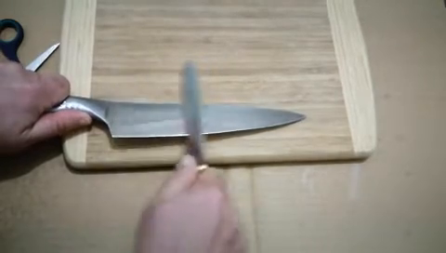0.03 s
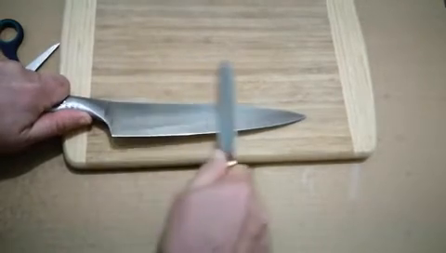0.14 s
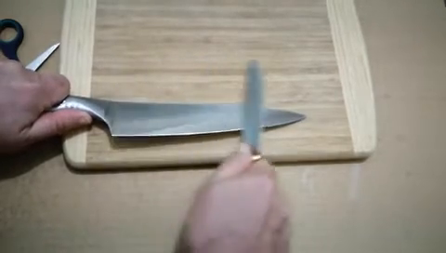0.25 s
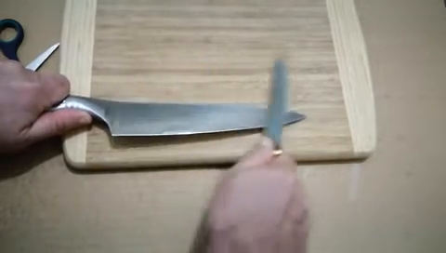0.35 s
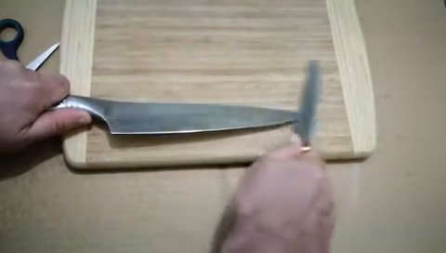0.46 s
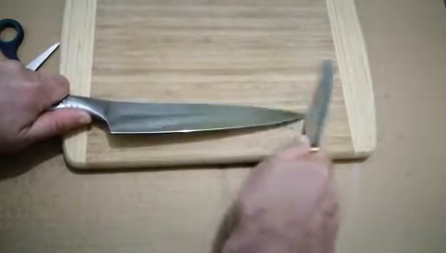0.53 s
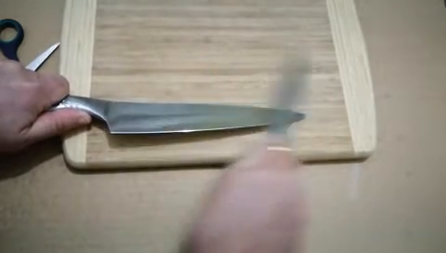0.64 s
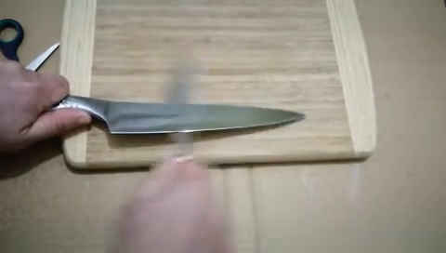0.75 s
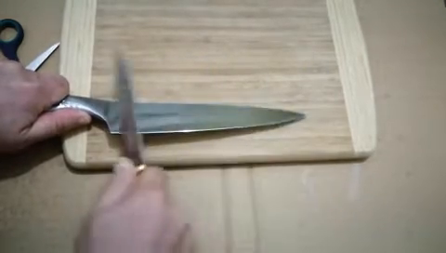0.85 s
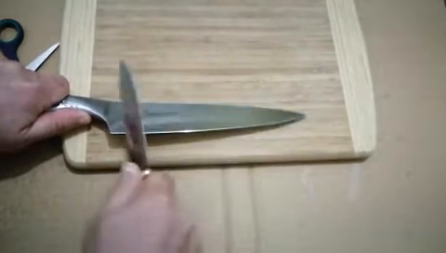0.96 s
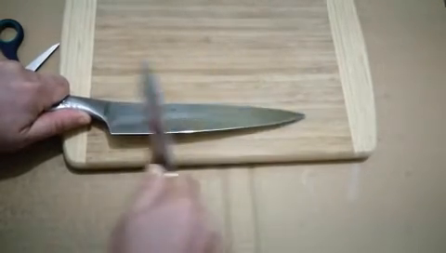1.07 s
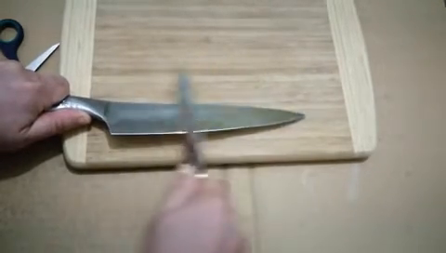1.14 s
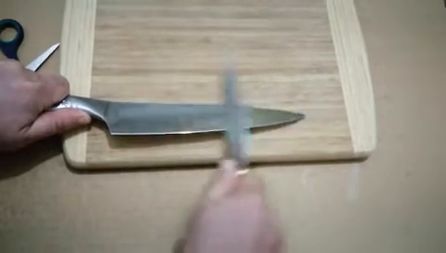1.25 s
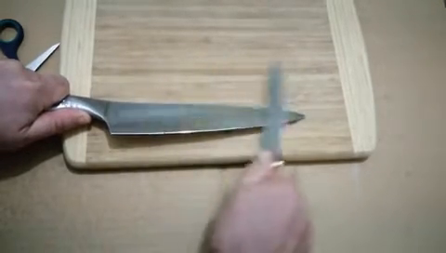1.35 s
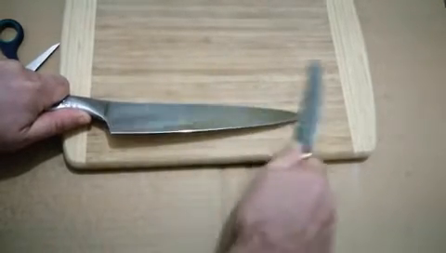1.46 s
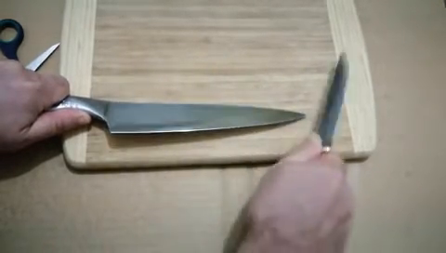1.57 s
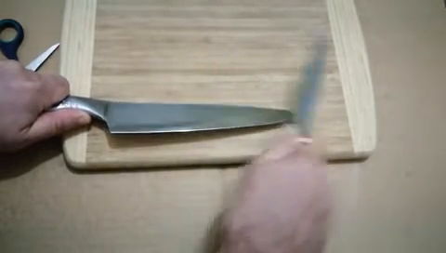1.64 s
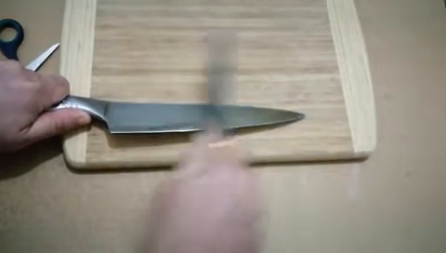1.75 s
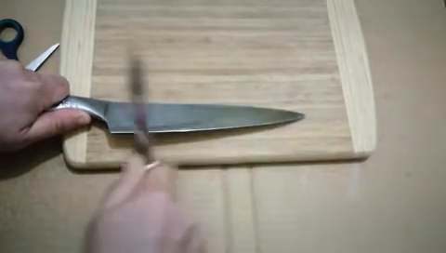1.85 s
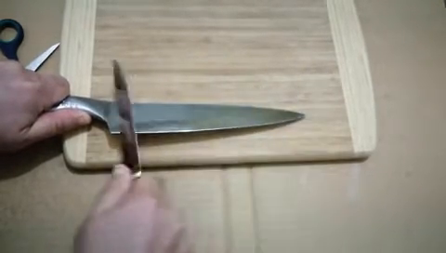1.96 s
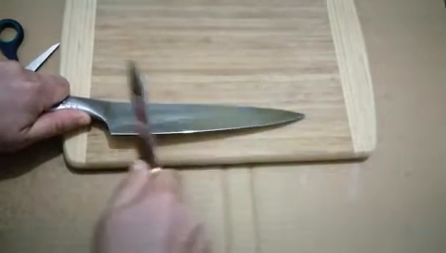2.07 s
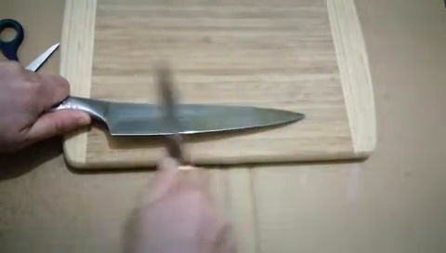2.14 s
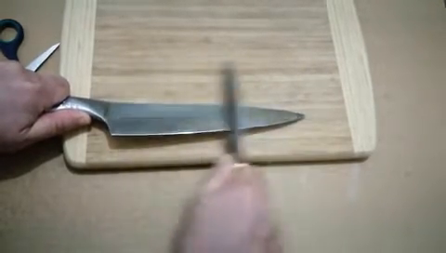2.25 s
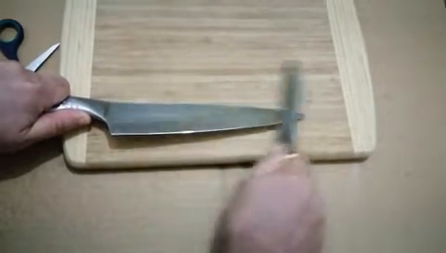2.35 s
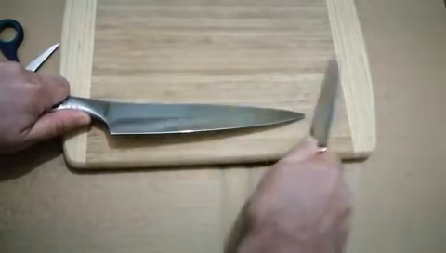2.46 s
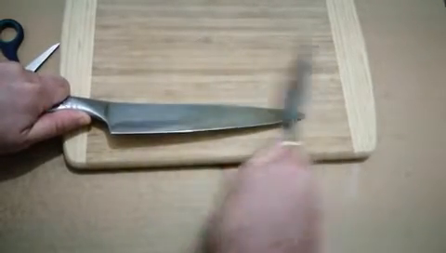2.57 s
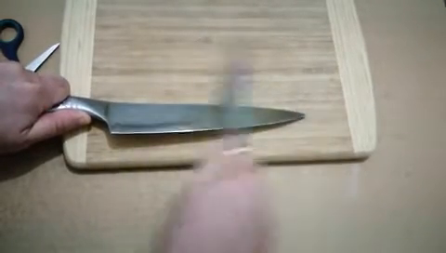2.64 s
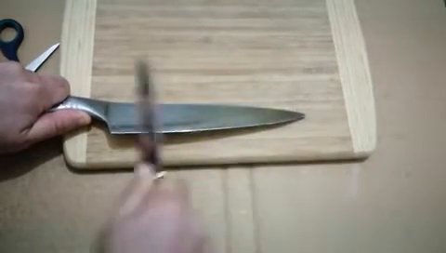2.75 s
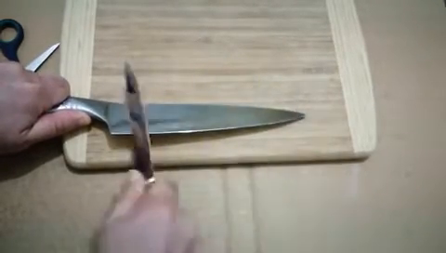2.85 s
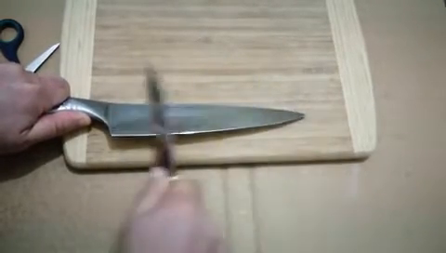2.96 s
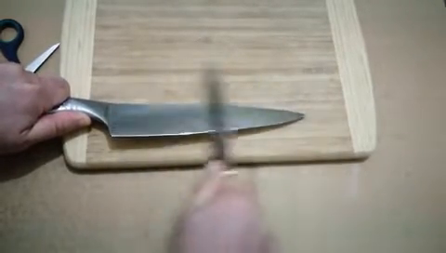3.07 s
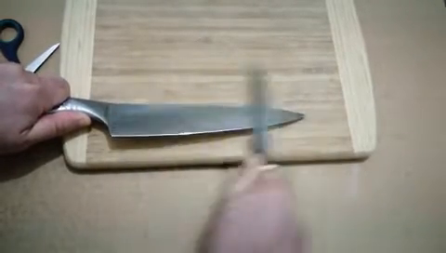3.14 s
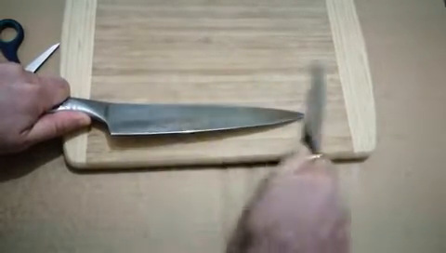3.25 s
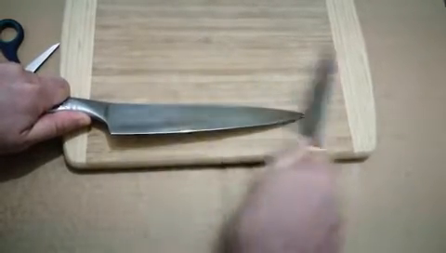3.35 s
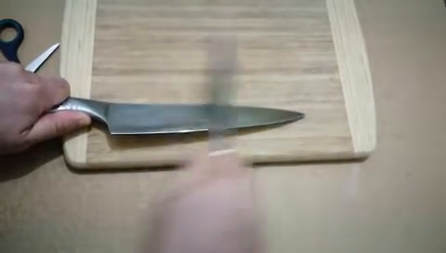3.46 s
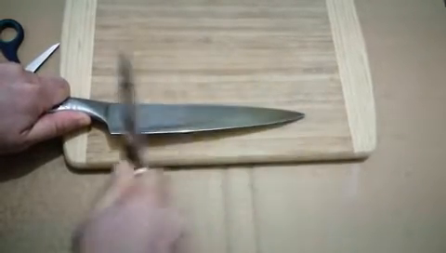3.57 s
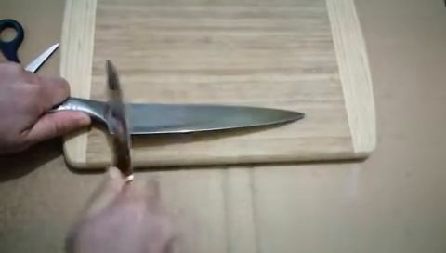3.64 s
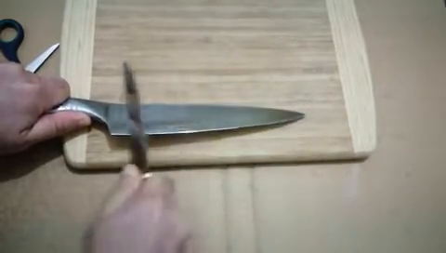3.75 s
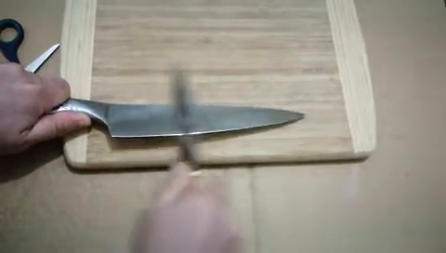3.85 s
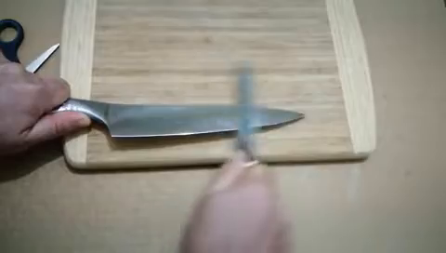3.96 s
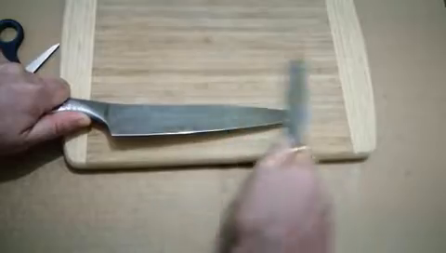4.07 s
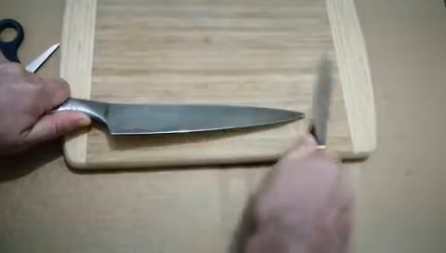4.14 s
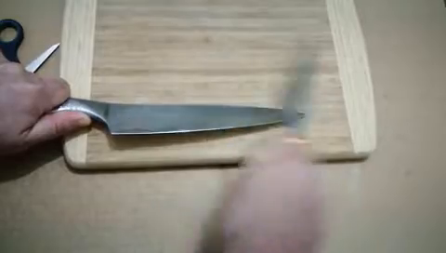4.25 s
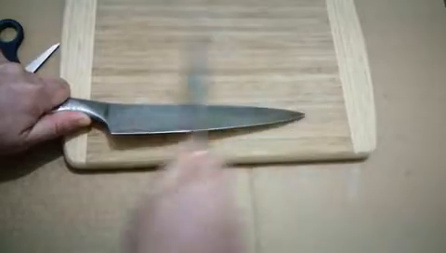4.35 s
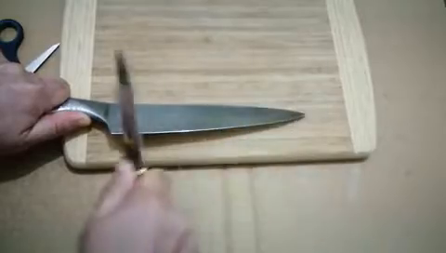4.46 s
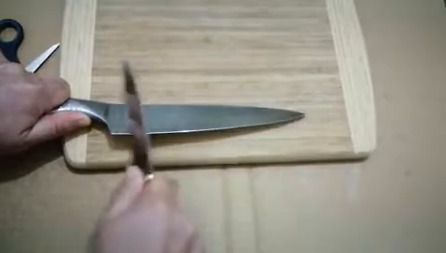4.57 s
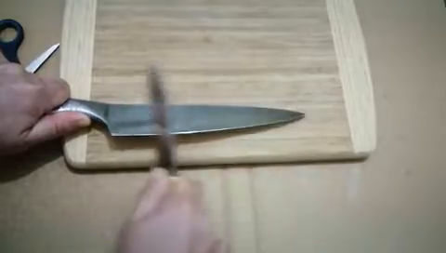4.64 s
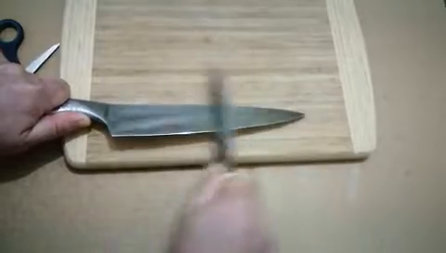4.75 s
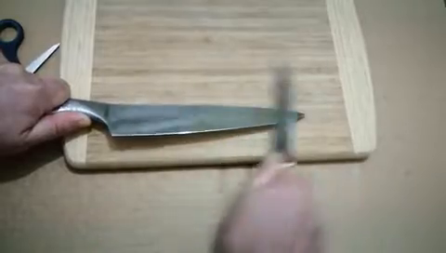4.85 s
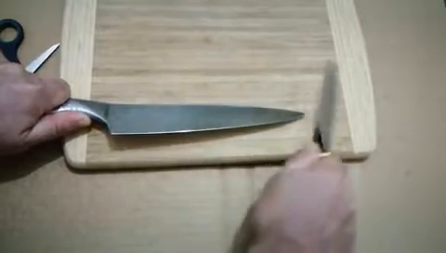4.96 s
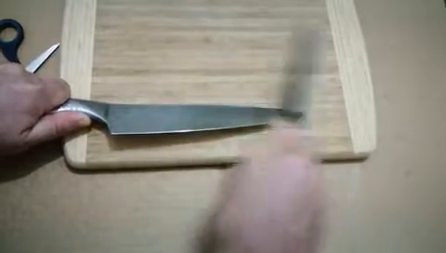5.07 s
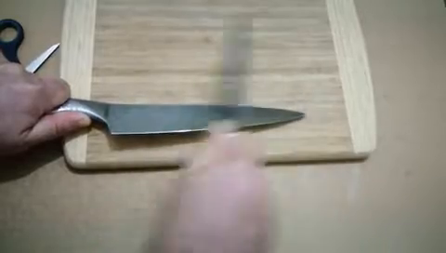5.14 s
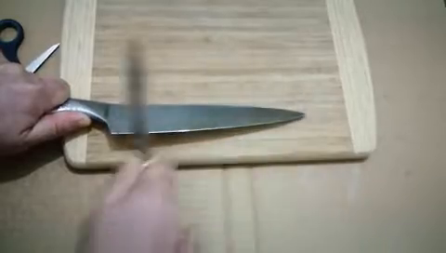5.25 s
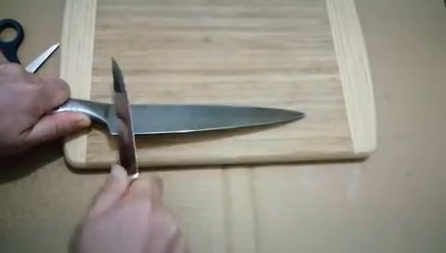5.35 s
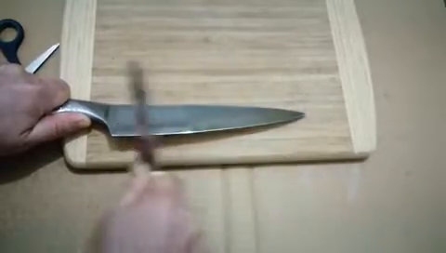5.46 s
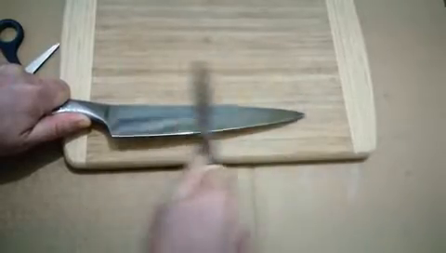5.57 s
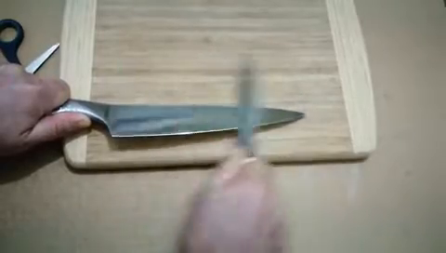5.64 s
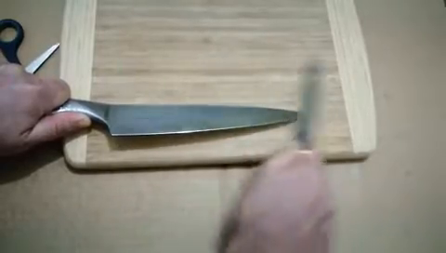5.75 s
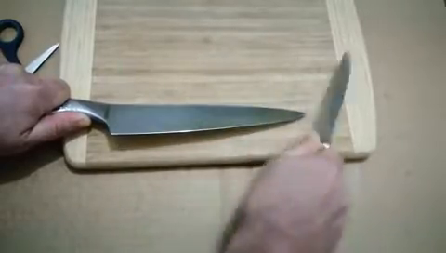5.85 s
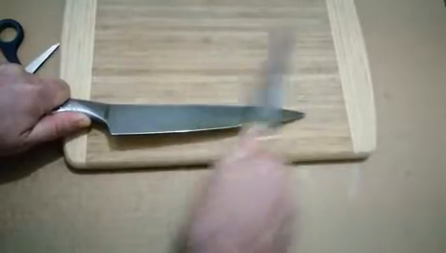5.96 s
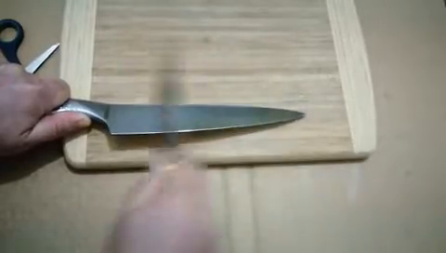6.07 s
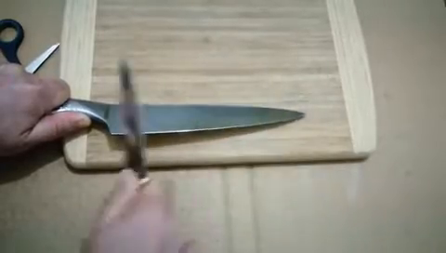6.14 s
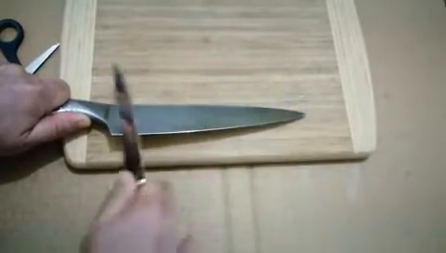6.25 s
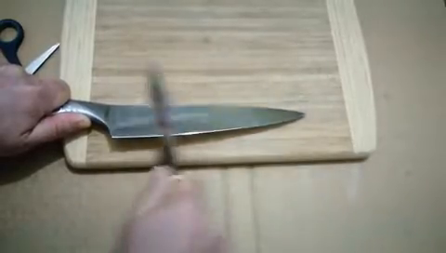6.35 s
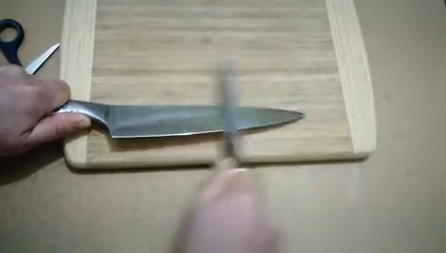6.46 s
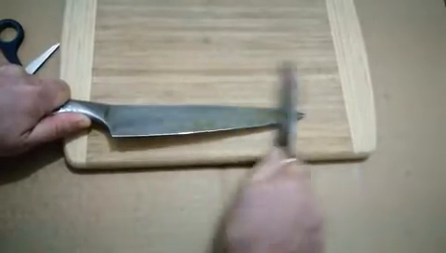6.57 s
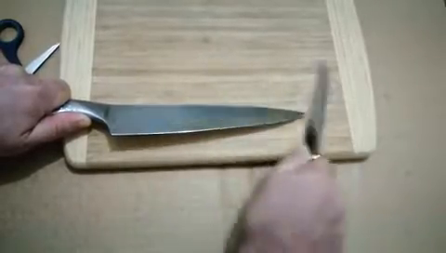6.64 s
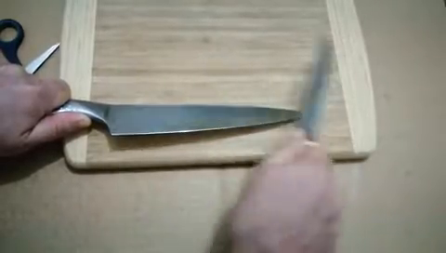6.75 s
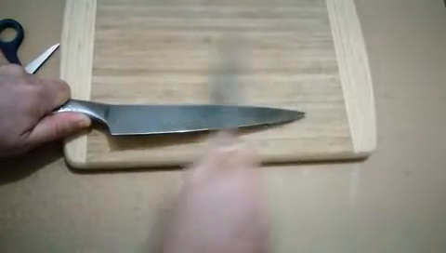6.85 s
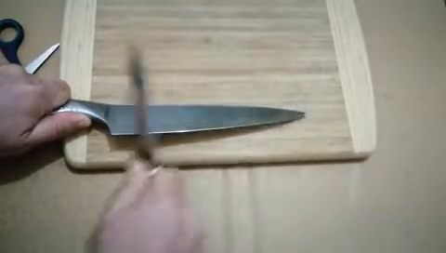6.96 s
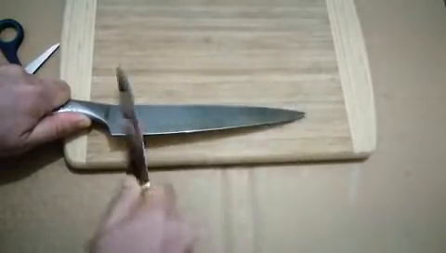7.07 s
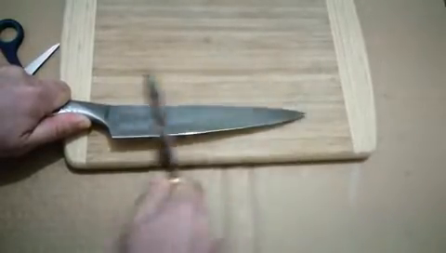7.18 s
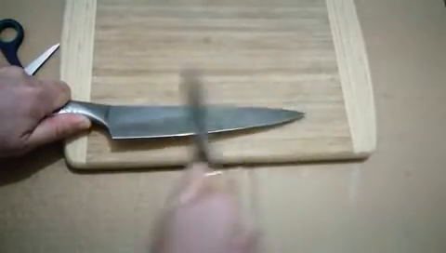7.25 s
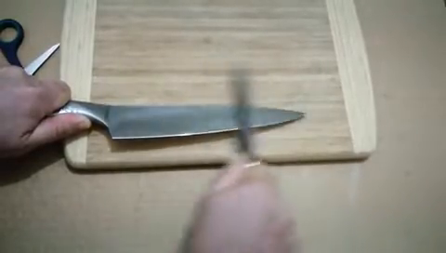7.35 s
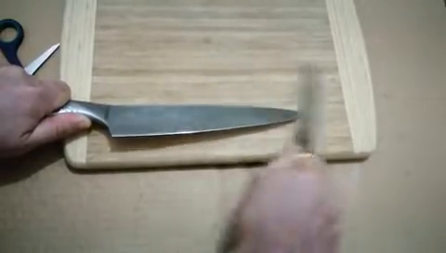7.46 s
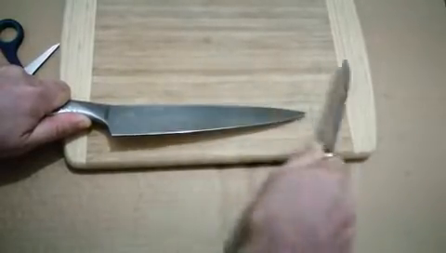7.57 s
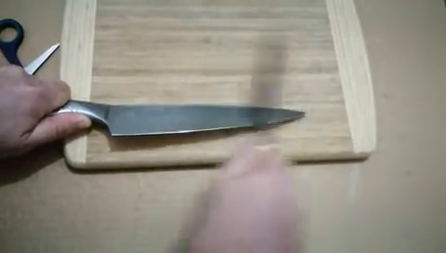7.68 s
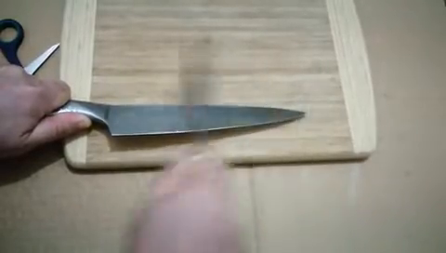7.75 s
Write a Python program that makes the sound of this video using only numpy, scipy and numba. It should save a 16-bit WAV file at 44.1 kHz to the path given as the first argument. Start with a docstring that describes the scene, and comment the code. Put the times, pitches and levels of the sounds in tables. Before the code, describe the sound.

Close microphones in a quiet room pick up one knife scraping along another in an even rhythm. The blade lands with a clack, grates along the steel with small ticks and a hoarse rasp, then slips off with a short, high ring. The wooden board underneath adds low, hollow knocks. There are nine strokes with brief gaps, some later ones ending more sharply, over faint rumble and hiss.

```python
"""Gritty scrapes, each ending in a bright ring: a small steel knife is drawn along a large one, stroke by
stroke. The large knife lies flat on a wooden board in a quiet room, and two close microphones listen.
The edge lands near the handle, grates along the blade and flicks off the tip, leaving the steel ringing.
Burrs (tiny rough bits of metal) catch as dense clicks, and these make the steel and the board vibrate."""
import sys
import numpy as np
from scipy import signal
from scipy.fft import rfft, irfft, next_fast_len
from scipy.io import wavfile
from scipy.ndimage import uniform_filter1d
from numba import njit

SR = 44100
rng = np.random.default_rng(int(sys.argv[2]) if len(sys.argv) > 2 else 0)


def digitize_waveform(pressure):
    """Quantize a signal to 16-bit integers and store it at the path in sys.argv[1].

    Rows of a 2-D input are taken as channels; values are limited to [-1, 1].
    """
    field = np.atleast_2d(pressure).T
    bounded = np.clip(field, -1, 1)
    quanta = np.round(bounded * 32767).astype(np.int16)
    wavfile.write(sys.argv[1], SR, quanta)


N = 344356
SIZE = next_fast_len(N + SR)
HZ = np.maximum(np.arange(SIZE // 2 + 1) * SR / SIZE, 1)   # the frequencies of a spectrum


def from_db(db):
    """Turn decibels into a gain."""
    return 10 ** (np.asarray(db) / 20)


def rms_one(x):
    """Scale a signal to an average power of 1."""
    return x / np.sqrt(np.mean(x ** 2) + 1e-20)


def at_hz(points, hz):
    """Read between the rows of a table, along a log-frequency axis."""
    hz_points, values = np.transpose(points)
    return np.interp(np.log(hz), np.log(np.maximum(hz_points, 1)), values)


def shaped(x, response):
    """Filter with one gain for each frequency in HZ."""
    return irfft(rfft(x, SIZE) * response, SIZE)[..., :N]


def band(x, low, high):
    """Keep what lies between two frequencies."""
    return signal.sosfilt(signal.butter(2, [low, high], "band", fs=SR, output="sos"), x)


def drift(rate_hz, count=1, spread_db=None):
    """Slow random wandering of about +-1, or a wandering gain if spread_db is given."""
    r = np.exp(-128 * np.pi * rate_hz / SR)
    noise = rng.standard_normal((count, N // 64 + 702))   # one value per 64 samples
    slow = signal.lfilter([1], [1, -2 * r, r * r], noise)[:, 700:]
    slow = slow / slow.std(axis=1, keepdims=True)
    slow = slow if spread_db is None else from_db(spread_db * slow)
    return np.repeat(slow, 64, axis=1)[:, :N]


def resonate(x, hz, t60):
    """One mode: a natural tone of an object. Its ring time t60 is how long it takes to fade by 60 dB."""
    r = from_db(-60 / (max(t60, .004) * SR))
    feedback = [1, -2 * r * np.cos(2 * np.pi * hz / SR), r * r]
    return signal.lfilter(np.array([1, 0, -1]) * (1 - r * r) / 2, feedback, x + 1e-18)


@njit
def glide(x, hz, width_hz):
    """A resonance whose pitch can move."""
    r = np.exp(-np.pi * width_hz / SR)
    y = np.zeros(len(x))
    for i in range(2, len(x)):
        drive = (1 - r * r) / 2 * (x[i] - x[i - 2])
        y[i] = drive + 2 * r * np.cos(2 * np.pi * hz[i] / SR) * y[i - 1] - r * r * y[i - 2]
    return y


# Tone of the background noise: f/Hz, relative level/dB
AIR_TONE = [(13, -49.5), (22, 0.5), (66, -6.5), (142, -9.5), (203, -5), (425, -13.5), (501, -15.5),
            (2260, -24), (2740, -24), (5740, -27.5), (15400, -35.5)]
# How alike its left and right sides are: f/Hz, likeness (1 same, -1 opposite)
AIR_LIKENESS = [(60, 0.35), (180, 0.71), (550, 0.94), (1650, -0.41), (4970, 0.032), (15000, 1)]
def air():
    """Quiet room rumble and microphone hiss."""
    mid, side = rng.standard_normal((2, N))
    alike = np.clip(at_hz(AIR_LIKENESS, HZ), -1, 1)
    colour = from_db(at_hz(AIR_TONE, HZ))
    mid = shaped(mid, colour * np.sqrt(1 + alike))
    side = shaped(side, colour * np.sqrt(1 - alike))
    return from_db(-64.5) * rms_one(mid + side * [[1], [-1]])


# What the walls send back: f/Hz, relative level/dB
WALLS = [(100, -12.5), (500, 6.5), (1300, -2), (2500, 6.5), (4200, 3), (6500, -4), (10000, -6.5),
         (15000, -14)]
# How long the room rings: f/Hz, ring time/s
ROOM_RING = [(100, 0.4), (700, 0.28), (5000, 0.3), (13000, 0.4)]
def room(x, gain_db=-7.5, alike_below_hz=600):
    """Echoes blur into a tail of fading noise, alike on both sides in the bass."""
    t, tail = np.arange(SR // 2) / SR, 0
    for low in 60 * 2. ** np.arange(8):
        hz = low * np.sqrt(2)
        mid, side = band(rng.standard_normal((2, len(t))), low, 2 * low)
        apart = np.sqrt(hz / (hz + alike_below_hz))
        tail = tail + (mid + apart * side * [[1], [-1]]) * from_db(-60 * t / at_hz(ROOM_RING, hz))
    tail = tail * (1 - np.exp(-(t / 0.001) ** 2))   # the first echoes take a moment
    tail = tail / np.sqrt(np.sum(tail ** 2) / 2)
    return shaped(x, rfft(tail, SIZE) * from_db(at_hz(WALLS, HZ) + gain_db))


def modes(table, knock, mid, tip, held, shimmer_db):
    """Modes ring freely at the tip; elsewhere the pressing edge cuts their ring time to the share held."""
    out = np.zeros((2, N))
    for k, (hz, t60, knock_db, mid_db, tip_db, pan_db) in enumerate(table):
        # the edge crosses each mode's still spots (nodes), and the blade tilts
        nodes, tilt = drift(8.9, count=2, spread_db=shimmer_db / 2)
        pressed = from_db(knock_db) * knock + from_db(mid_db) * nodes * nodes * mid
        ring = resonate(pressed, hz, t60 * held) + resonate(from_db(tip_db) * nodes * tip, hz, t60)
        side = (-1) ** k * from_db(pan_db / 2) * tilt
        out[0] += ring * side
        out[1] += ring / side
    return out


# Modes of the board: f/Hz, ring time/s, knock level/dB, mid-blade level/dB, tip level/dB, left-right/dB
BOARD_MODES = [(72.3, 0.2, 10.5, -6.5, -10, 1.5), (175.4, 0.14, 6.5, -0.5, -8, 1.5),
               (250.3, 0.14, 4.5, -1, -9, 5), (353, 0.039, 0, -5.5, 1, 8.5), (746, 0.028, -4, -5.5, -7, -3),
               (834, 0.053, 0.5, -5.5, 0, 6), (1283, 0.024, -13, -33.5, -12.5, 0.5)]
def board(landing, thud, mid, tip):
    """The wood under the large knife answers knocks and scraping with low, hollow tones."""
    knock = from_db(3.5) * band(landing, 464, 3000) + thud
    return from_db(18) * modes(BOARD_MODES, knock, mid, tip, held=0.86, shimmer_db=1.5)


# Tones of the grinding marks: f/Hz, pitch wander/Hz, width/Hz, level/dB, left-right/dB
SINGING_MARKS = [(5370, 210, 190, 6, 7.5), (6140, 250, 94, 11, -8.5), (6780, 280, 190, 9.5, 3.5),
                 (8060, 300, 128, 2.5, 17)]
def singing(force):
    """Grinding marks sing as they pass under the edge: narrow tones that glide, come and go."""
    out = np.zeros((2, N))
    for hz, wander_hz, width_hz, db, pan_db in SINGING_MARKS:
        drive = force * drift(18, spread_db=5)[0]
        tone = glide(drive, hz + wander_hz * drift(5)[0], width_hz)
        out += tone * from_db(db + np.array([[pan_db / 2], [-pan_db / 2]]))
    return out


def rasp(force, hz):
    """The hoarse middle of the scrape; filtering twice keeps it close to its moving pitch."""
    return from_db(15.5) * glide(glide(force, hz, 400), hz, 400)


def blade_echo(x, delay_s=.0016, sweep_s=0.0003065):
    """The blade's ends send the sound back; the delay wanders as the contact moves."""
    now = np.arange(N)
    earlier = now - SR * (delay_s + sweep_s * drift(2.51, count=2))
    return x + np.array([np.interp(when, now, channel) for when, channel in zip(earlier, x)])


# Tone of the gritty contact noise: f/Hz, relative level/dB
GRIT_TONE = [(60, -27.5), (300, -3), (1200, -26.5), (1800, -19), (2600, -17), (4200, -23), (5600, -8.5),
             (7500, -13), (10000, -31.5), (13500, -35.5), (15200, -39)]
# Which side it leans to: f/Hz, left-right/dB
GRIT_PAN = [(100, -6), (330, 6.5), (1200, 2.5), (4200, -5.5), (6000, -13), (7000, 3), (8000, -4),
            (10500, 21), (13000, 4.5), (15000, 27)]
def grit(force):
    """The broad noise of steel touching steel, which fills the gaps between the modes."""
    pan_db = at_hz(GRIT_PAN, HZ) / 2
    gain = from_db(at_hz(GRIT_TONE, HZ) + 14.5 + np.array([pan_db, -pan_db]))
    return blade_echo(shaped(force, gain))


# Pitches of the steel's modes: f/Hz
STEEL_HZ = [2250, 2900, 3440, 3780, 4690, 5120, 5400, 5700, 5930, 6080, 6180, 6481, 7120, 7340, 7520, 7700,
            7965, 8500, 8858, 9600, 9797, 10840, 11770, 11970, 13030, 13240, 13535, 14395, 14535, 14990,
            15215]
# One row per pitch: undamped ring time/s, knock level/dB, mid-blade level/dB, tip level/dB, left-right/dB
STEEL_MODES = [(0.033, -15.5, -7.5, -29, 0), (0.022, -18, -8, -10.5, 6.5), (0.029, -20, -12, -21, -9.5),
               (0.05, -39.5, -7, -35, 7.5), (0.035, -10.5, -23.5, -16, -10.5),
               (0.035, -3.5, -12, -1.5, 8.5), (0.033, -7, -33, -10, -9), (.1, -17.5, -10, -27, 17),
               (.1, -10.5, -6, 0, 0), (0.11, -4, -7.5, -13.5, -5), (0.036, -4.5, -23, -6, -13),
               (0.12, -4.5, -3, 0, -14.5), (0.058, -1.5, -16.5, -27.5, 9), (0.13, -1.5, -3, 0, 10),
               (0.14, -9, -21.5, -15, 12.5), (0.062, -18, -11, -22.5, 13), (0.37, -11, -13.5, -5.5, 11),
               (0.09, -6, -13, -16, 17), (0.34, -5, -13.5, -12, 9), (.08, -6.5, -40, -43, 18),
               (0.27, -6.5, -25, -3, -4.5), (0.36, -29.5, -10, -4.5, 5.5), (0.31, -2, -23, -24.5, 8),
               (0.19, -16, -22, -13, -8), (0.17, -7, -19.5, -12, -9), (0.15, -24, -12.5, -25, -3),
               (.06, -15.5, -18.5, -31, -1.5), (.1, -15, -25, -11, -0.5), (0.053, -7, -22, -25, -12.5),
               (.06, -20.5, -10, -36, 1), (0.15, -18, -9.5, -5.5, -11)]
def steel(landing, mid, tip):
    """The bright ring of the steel; hand and board damp the lower modes hardest."""
    damped = [(hz, min(t60, .06 if hz < 6400 else .19), *levels)
              for hz, (t60, *levels) in zip(STEEL_HZ, STEEL_MODES)]
    return from_db(14) * modes(damped, landing, mid, tip, held=0.55, shimmer_db=4)


def knocks(events, chatter_s, gain_db):
    """Each knock is a short, fading chatter of contacts. Gives four forces: steel, rasp, hiss, board."""
    force, span = 1e-12 * rng.standard_normal((4, N + 600)), np.arange(600)
    chatter = rng.standard_normal((len(events), 600))
    fading = np.exp(-span / (chatter_s * SR)) * (1 - np.exp(-span / 29))
    for (s, db, low_db, *extra), burst in zip(events, chatter):
        at = round(s * SR)
        hiss_db = extra[0] if extra else 0
        gains = from_db(db + gain_db + np.array([[0], [low_db], [hiss_db], [low_db]]))
        force[:, at:at + 600] += gains * rms_one(burst * fading) / 3
    return force[:, :N]


def thuds(events, push_s, gain_db):
    """Each knock pushes the large blade once against the board."""
    clicks, r = np.full(N, 1e-12), np.exp(-1 / (push_s * SR))
    for s, db, *_, thud_db in events:
        clicks[round(s * SR)] = from_db(db + thud_db + gain_db)
    return signal.lfilter([1 - r], [1, -r], clicks)


# Catches on a burr: t/s, level/dB, extra for lows and thud/dB
SNAGS = [(0.1984, -47, 5), (0.3524, -44, 13), (0.6215, -27, -32), (1.325, -43, 6), (1.4222, -44, 12),
         (1.6117, -40, -12), (1.6257, -20, -1.5), (2.2454, -51, 0), (2.5336, -40, -23), (2.5556, -22, -23),
         (2.5855, -19, -40), (3.3727, -31.5, -22), (3.3917, -22.5, -17), (4.2677, -40, -16),
         (4.9277, -45, 0), (4.946, -37, 14), (5.0734, -29, -22), (5.6331, -44, 2), (5.803, -42, 3),
         (5.911, -34, -25), (5.9219, -15.5, -36), (5.9369, -16, -11.5), (6.452, -44, 11),
         (6.6494, -37.5, 12), (6.7565, -44, -23), (6.776, -25, -12), (7.371, -46, 9), (7.5887, -21, -16),
         (7.6026, -18, -19), (7.6164, -11.5, -20)]
def snags():
    """The edge snags on a burr, giving a tick and a small thud."""
    return knocks(SNAGS, chatter_s=.003, gain_db=-12), thuds(SNAGS, push_s=0.000099, gain_db=-1.5)


# Touchdowns of the edge: t/s, level/dB, extra for lows/dB, extra for hiss/dB, extra for thud/dB
LANDINGS = [(1.0807, -16, -13, -13, -25.5), (2.0859, -16.5, -18.5, -15.5, -25),
            (2.9894, -17.5, -16, -12.5, -25), (3.8228, -16, -16.5, -10, -29.5),
            (4.687, -17.5, -26, -12.5, -22.5), (5.5127, -19.5, -20, -11.5, -24.5),
            (6.3684, -16.5, -19, -11.5, -33), (7.074, -53, -13, -13, -33), (7.228, -17, -18.5, -15, -24)]
def landings():
    """The small knife lands on the large one, giving a clack and a thud."""
    return knocks(LANDINGS, chatter_s=0.0028, gain_db=3.5), thuds(LANDINGS, push_s=0.00018, gain_db=21)


def stroke_shape(row):
    """The edge skids, rests, bites, eases and slips off: (time, value) points for levels and rasp pitch."""
    (bite, peak, grate_db, ease, eased_db, flick, flick_db,
     bite_db, swell, rasp_db, rasp_hz, lean_db, push, push_db, slip_db) = row
    land = max([s for s, *_ in LANDINGS if s < bite], default=bite - 1)
    skid, rest, rise = land + .012, land + .052, bite - .05
    slip, slip_peak, end = flick - .014, flick + .0046, flick + .032
    steel_levels = [(skid, -43.5), (rest, -55.5), (bite, -55.5), (peak, grate_db), (ease, eased_db),
                    (flick, flick_db), (end, flick_db - 15.5)]
    hiss_offsets_db = [-3.5, -3.5, -9, -9, -9, -9, 0]
    hiss_levels = [(s, db + offset) for (s, db), offset in zip(steel_levels, hiss_offsets_db)]
    rasp_levels = [(skid, -62.5), (rise, -62.5), (bite, bite_db), (swell, rasp_db), (ease, rasp_db - 10.5),
                   (slip, rasp_db - 10.5), (slip_peak, slip_db), (end, slip_db - 14.5)]
    board_levels = sorted([(skid, -48), (rest, lean_db), (push - .11, lean_db), (push, push_db),
                           (slip, -59), (slip_peak, slip_db - 7.5), (end, slip_db - 22)])
    pitch_hz = [(rise, 864), (bite, 1344), (swell, rasp_hz), (ease, 1024), (slip, 1344)]
    return skid, end, (steel_levels, rasp_levels, hiss_levels, board_levels), pitch_hz


def burrs(per_s, spread_db, clump_db):
    """Burrs catch as random clicks of uneven size, coming in clumps."""
    sizes = from_db(spread_db * np.minimum(rng.exponential(1, N), 4)) * rng.choice([-1, 1], N)
    caught = rng.random(N) < per_s / SR
    return rms_one(sizes * caught * drift(48, spread_db=clump_db)[0])


# One row per stroke; the levels are those of the rubbing force:
#   edge bites t/s; grating peaks t/s, level/dB; hand eases t/s, level/dB; flick off the tip t/s, level/dB;
#   rasp at the bite level/dB; rasp swells t/s, level/dB, f/Hz;
#   board at rest level/dB; board is pushed t/s, level/dB; rasp at the slip level/dB
STROKES = [(-.12, 0.02, -40.5, .53, -54, 0.639, -35, -44.5, 0.35, -46, 1297, -55.5, .4, -53.5, -56),
           (1.206, 1.31, -43.5, 1.553, -50.5, 1.647, -26.5, -52, 1.447, -41, 1290, -55.5, 1.525, -40.5, -38),
           (2.23, 2.32, -46, 2.517, -44.5, 2.61, -33, -52, 2.45, -44, 1070, -57.5, 2.28, -57, -50),
           (3.128, 3.215, -46.5, 3.354, -47.5, 3.405, -29, -55.5, 3.29, -44, 1180, -57.5, 3.36, -55, -49),
           (3.949, 4.09, -46.5, 4.21, -53, 4.29, -25.5, -54.5, 4.13, -46, 1190, -57.5, 4.08, -52.5, -34),
           (4.827, 4.953, -47, 5.015, -53.5, 5.06, -26.5, -56.5, 4.95, -45, 1170, -59, 4.96, -48.5, -38),
           (5.605, 5.714, -46, 5.865, -53.5, 5.937, -21.5, -52.5, 5.81, -50, 1060, -55.5, 5.75, -59, -27),
           (6.504, 6.573, -45.5, 6.72, -47.5, 6.797, -26.5, -57.5, 6.655, -42, 1090, -57.5, 6.655, -52.5, -35.5),
           (7.328, 7.436, -46.5, 7.6, -43, 7.604, -24.5, -52.5, 7.54, -46, 1200, -56, 7.49, -47.5, -31)]
def grating(tip_s=0.12):
    """The edge rubs over burrs. Gives forces (steel, rasp, hiss, board), nearness to the tip, rasp pitch."""
    t = np.arange(N) / SR
    curves = np.full((5, N), 1e-9)   # four force levels, then nearness to the tip
    rasp_hz = np.full(N, 1344.)
    for row in STROKES:
        start, end, levels, pitch = stroke_shape(row)
        on = (t >= start) & (t < end)
        curves[:4, on] = from_db([np.interp(t[on], *np.transpose(points)) for points in levels])
        curves[4, on] = np.clip(1.3 - 1.26 * (end - t[on]) / tip_s, 1e-9, 1)
        rasp_hz[on] = np.interp(t[on], *np.transpose(pitch))
    curves = uniform_filter1d(curves, size=200, axis=1)   # contact is made in a few ms
    fade = np.exp(-1 / (0.0055 * SR))   # the last burrs let go gradually
    curves = signal.lfilter([1 - fade], [1, -fade], curves)
    flutter = drift(18, count=4, spread_db=1.57)   # the hand's pressure wavers
    forces = curves[:4] * flutter * burrs(per_s=5000, spread_db=3.5, clump_db=1.17)
    return forces, curves[4], rasp_hz


def blend(forces):
    """Join the four forces, each in its own range: board and rasp low, steel above, fine hiss on top."""
    on_steel, on_rasp, on_hiss, on_board = forces
    lows = from_db(4) * band(on_board, 30, 582) + band(on_rasp, 547, 1314)
    return lows + band(on_steel, 1537, 9120) + from_db(12) * band(on_hiss, 7670, 22000)


def knives():
    """Landing, sliding and snagging shake the steel and the board."""
    rubbing, near_tip, rasp_hz = grating()
    ticks, snag_thuds = snags()
    clacks, landing_thuds = landings()
    sliding = rubbing + ticks
    slide, landing = blend(sliding), blend(clacks)
    mid, tip = slide * (1 - near_tip), slide * near_tip
    ringing = steel(landing, mid, tip) + board(landing, landing_thuds + snag_thuds, mid, tip)
    return ringing + rasp(sliding[1], rasp_hz) + singing(mid) + grit(slide + from_db(-13) * landing)


# How far the wave at the left microphone runs ahead of the right: f/Hz, phase/radians
LEFT_LEAD = [(100, 0), (600, .2), (950, .6), (1380, .1), (2240, .9), (2930, 3), (4130, .2), (4740, -.2),
             (5100, 3), (5600, 6.6), (16000, 6.3)]
def scene():
    """The knives as they reach two microphones, with the room's echo and the background noise."""
    source = knives()
    lead = at_hz(LEFT_LEAD, HZ) / 2
    direct = shaped(source, np.exp(1j * np.array([lead, -lead])))
    return direct + room(source.mean(axis=0)) + air()


def record(dry):
    """The highest treble is cut off steeply, above about 15.6 kHz."""
    soft = signal.sosfilt(signal.cheby2(10, 25, 15600, fs=SR, output="sos"), dry)
    return signal.sosfilt(signal.cheby2(12, 70, 16800, fs=SR, output="sos"), soft)


dry = scene()
out = record(dry)
digitize_waveform(out)
```